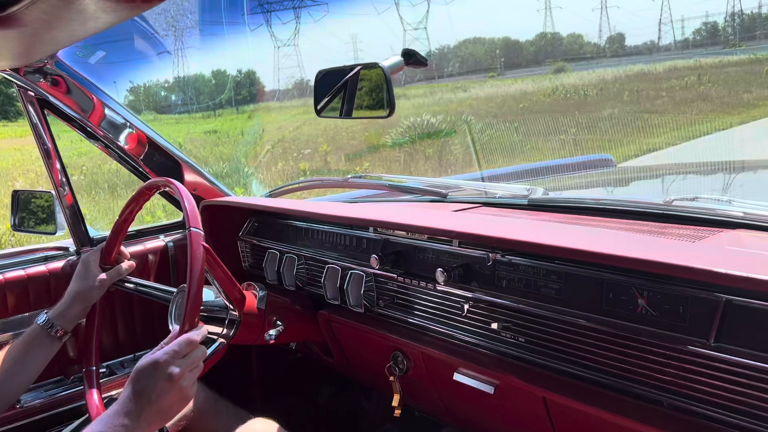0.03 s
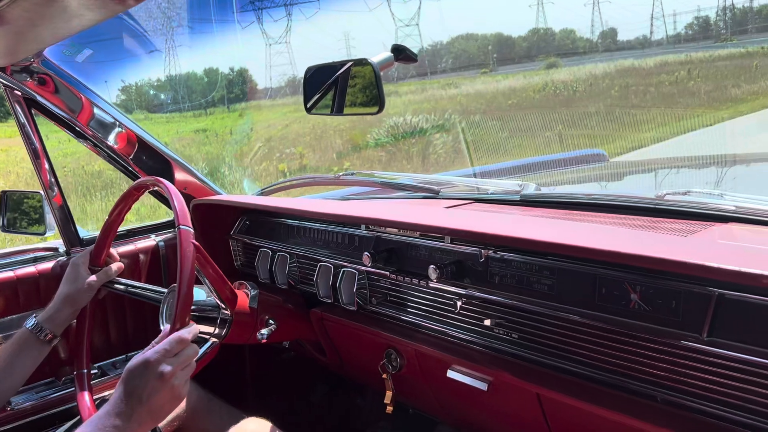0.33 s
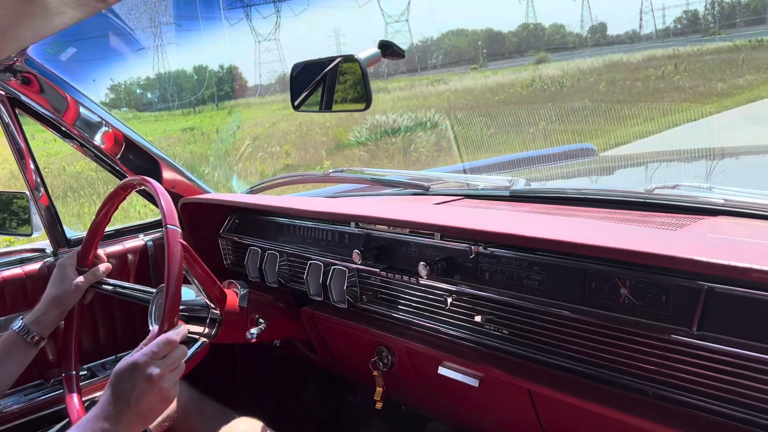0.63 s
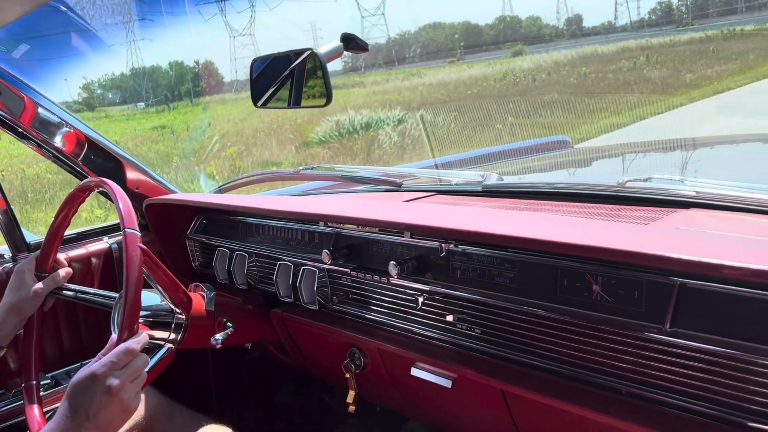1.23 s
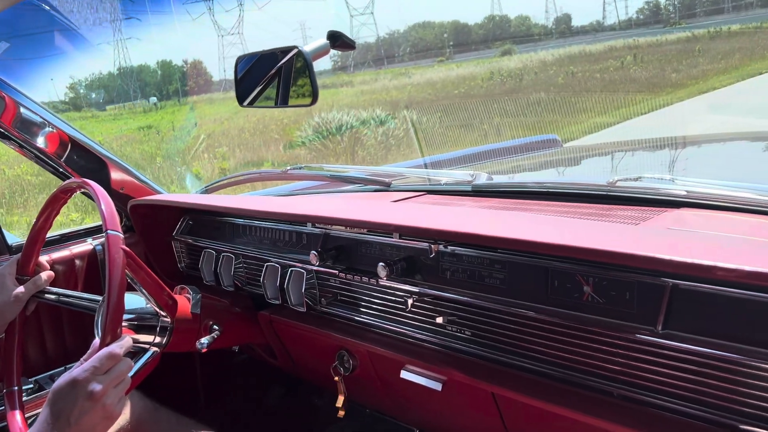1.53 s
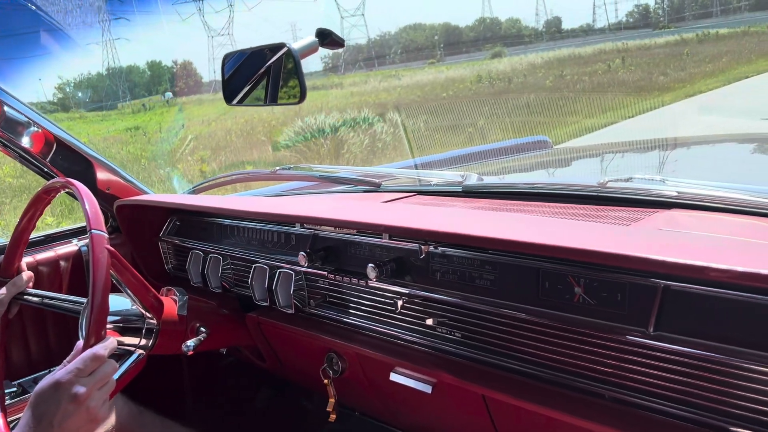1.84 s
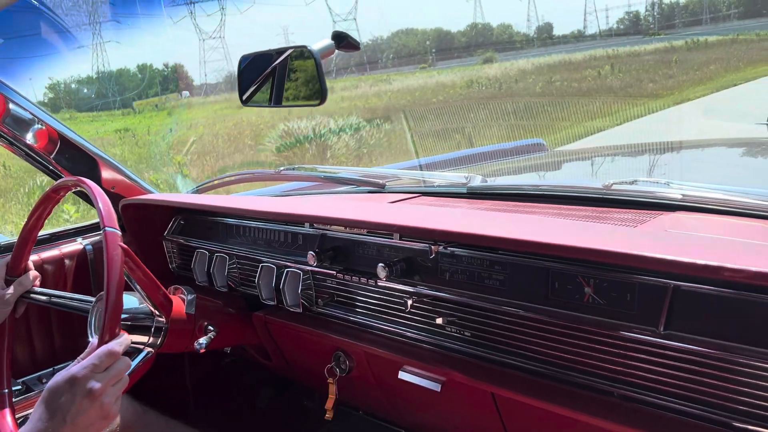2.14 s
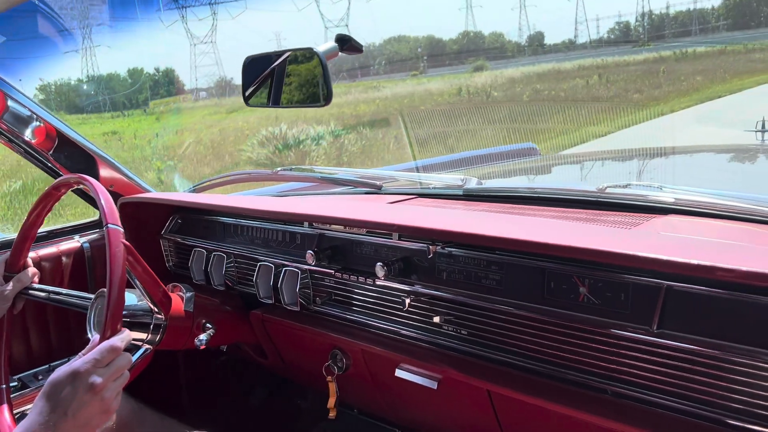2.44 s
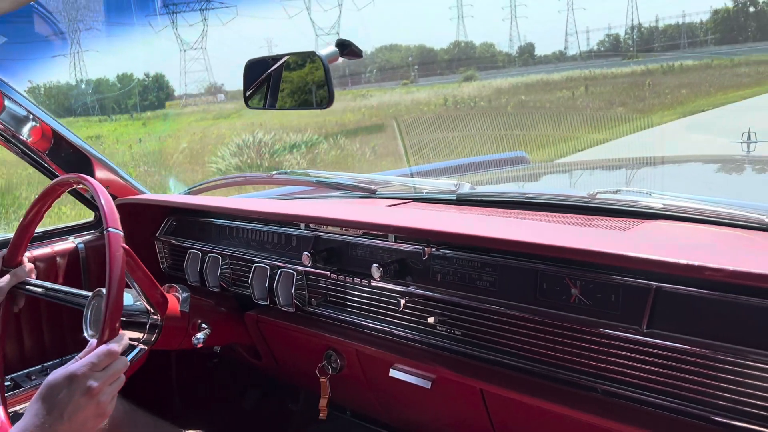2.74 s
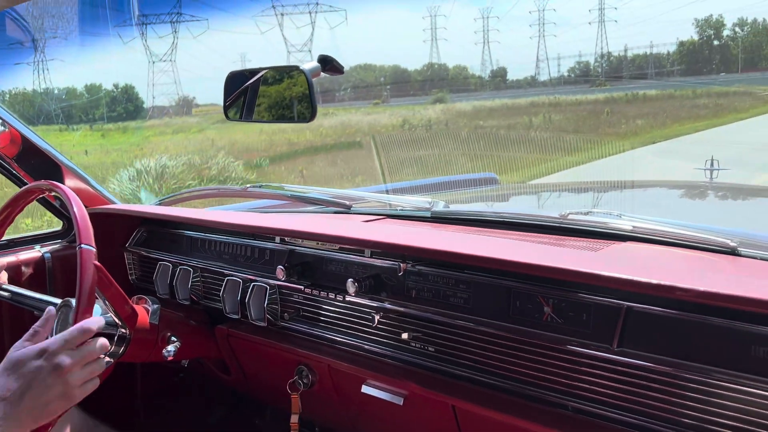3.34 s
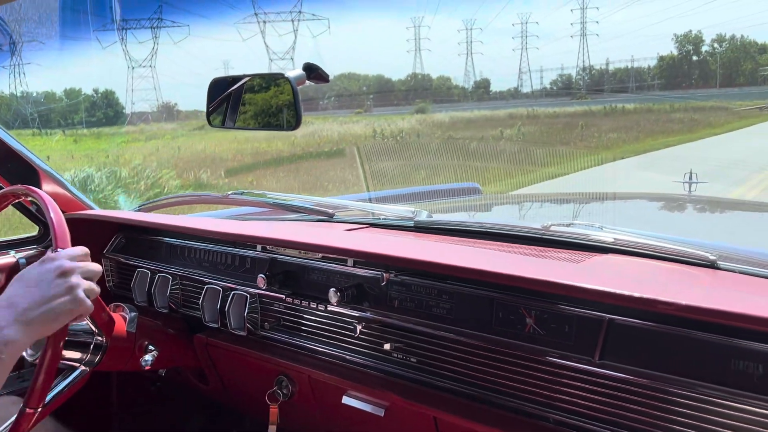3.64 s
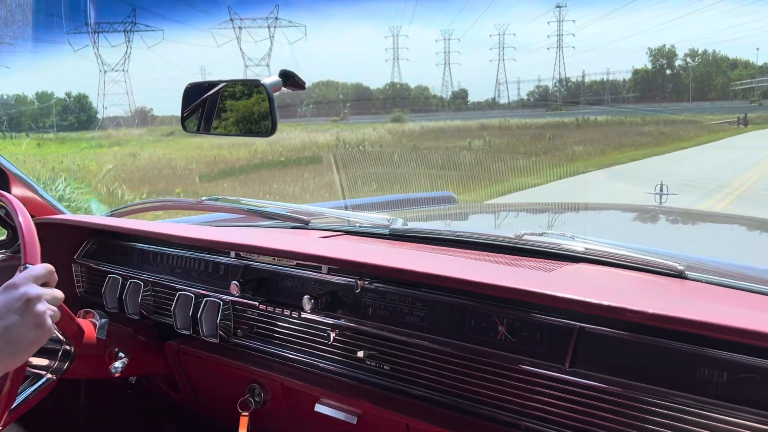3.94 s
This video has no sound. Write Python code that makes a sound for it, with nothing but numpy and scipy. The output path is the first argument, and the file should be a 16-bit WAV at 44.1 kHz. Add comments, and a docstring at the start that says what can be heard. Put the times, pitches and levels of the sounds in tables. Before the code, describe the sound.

Wind buffets the microphone in an old open car throughout, over low engine rumble, tyre roar and airy hiss. A sharp click sounds close by at 0.6 seconds. The wind eases around 1 second, then returns at 1.4 as a hand rubs the steering wheel. From 2 seconds the driving noise builds, with a few soft knocks, the strongest gusts near 2.1 and 2.9, and faint wheel creaks after 3.

```python
"""Inside an old open car that rolls through a bend and gathers speed, a stereo microphone in the draught.
Eddies of wind buffet the microphone, each a short puff that sinks into a thud. Below them the engine
rumbles in uneven exhaust pulses, and tyre roar and the hiss of passing air rise with speed.
Close by, something clicks in the cabin, a hand slides over the steering wheel and the wheel creaks."""
import sys
import numpy as np
from scipy import signal
from scipy.fft import rfft, irfft
from scipy.io import wavfile
from scipy.ndimage import uniform_filter1d, map_coordinates

SR = 44100
rng = np.random.default_rng(int(sys.argv[2]) if len(sys.argv) > 2 else 0)


def dump(signal):
    """Clip the signal to [-1, 1] and save it as 16-bit WAV at the path in sys.argv[1]."""
    limited = np.clip(np.atleast_2d(signal).T, -1, 1)
    pcm = np.round(limited * 32767).astype(np.int16)
    wavfile.write(sys.argv[1], SR, pcm)


N = 176400

# Strong eddies on the microphone. Each row: start in seconds, then thud, body, puff, rush in relative dB.
BUFFETS = [(0.044, -20, -42, -21, -45), (0.075, -21, -25, -28, -40), (0.083, -18, -32, -42, -45.5),
           (0.101, -32, -24, -27, -42), (0.115, -34, -23, -21.5, -44.5), (0.131, -38, -22, -22, -62),
           (0.169, -13, -27, -34, -46.5), (0.191, -25, -36, -16.5, -45), (0.253, -33, -16.5, -23, -54),
           (0.264, -35, -23.5, -46, -73), (0.271, -22, -20.5, -32, -64), (0.317, -16.5, -23, -31, -54),
           (0.343, -19.5, -29, -18.5, -45.5), (0.387, -14.5, -32.5, -25.5, -57),
           (0.402, -38, -22, -44, -61), (0.429, -24, -16, -39, -52), (0.449, -15, -56, -34, -65),
           (0.496, -47, -38, -35, -47.5), (0.51, -38, -36, -29, -61), (0.533, -31, -29, -37, -60),
           (0.559, -23.5, -33, -35, -61), (0.705, -18, -40, -56, -67), (0.82, -16, -50, -29, -46),
           (0.831, -20, -20, -32, -65), (0.865, -23, -29, -31.5, -54), (0.898, -30, -35, -35, -65),
           (1.342, -26.5, -27.5, -64, -50.5), (1.393, -19, -32, -38, -40.5), (1.475, -21, -32, -23.5, -45),
           (1.508, -35, -18, -14.5, -43), (1.525, -32, -28, -17, -61), (1.534, -12.5, -47, -46, -68),
           (1.565, -32.5, -24, -43, -48), (1.604, -22.5, -26.5, -20, -44), (1.641, -31, -18.5, -24.5, -50),
           (1.721, -20, -17, -27, -54), (1.731, -34, -20, -22.5, -52), (1.74, -14, -20, -13.5, -45),
           (1.808, -25, -31, -23.5, -44), (1.842, -33, -36, -24, -47), (1.879, -18.5, -23.5, -36, -49),
           (1.908, -26, -22.5, -24, -49), (1.944, -24, -30, -26.5, -45), (1.971, -29, -30, -19, -50),
           (2.029, -14.5, -41, -20.5, -66), (2.058, -20, -16.5, -23, -64), (2.071, -12, -38, -17.5, -58),
           (2.114, -46, -7.5, -30, -56), (2.144, -20, -15, -19, -50.5), (2.15, -30, -27, -29, -55),
           (2.164, -17, -16.5, -29, -67), (2.173, -34, -27, -31, -63), (2.183, -18, -35.5, -27, -56),
           (2.404, -28.5, -29, -25.5, -60), (2.463, -19, -23, -28, -52), (2.477, -20, -30, -21, -68),
           (2.487, -40, -20.5, -27, -53), (2.612, -17, -37, -15, -29.5), (2.619, -26, -21, -47, -70),
           (2.659, -19, -32, -23, -39.5), (2.737, -14.5, -21, -19, -45), (2.768, -12, -42, -30.5, -58),
           (2.805, -17.5, -22.5, -46, -64), (2.836, -20, -10.5, -23.5, -59), (2.841, -16.5, -6, -25.5, -55),
           (2.851, -22, -13, -22, -57), (2.875, -28, -23, -34, -46), (2.886, -15.5, -9, -20.5, -53),
           (2.915, -19, -19, -17.5, -51), (2.898, -14, -27, -30, -56), (2.93, -20.5, -16, -44, -60),
           (2.942, -23, -25, -48, -56), (3.003, -16, -37, -17, -37.5), (3.015, -15.5, -15.5, -20, -38),
           (3.127, -18.5, -23, -19, -40.5), (3.183, -19, -30, -24.5, -51), (3.294, -24.5, -22, -55, -65),
           (3.355, -15, -17.5, -29, -41.5), (3.547, -35, -23, -43, -50)]
# Noise of driving. Each row: time in seconds, tyre roar in dB, air hiss in dB.
DRIVING_LEVELS = [(0, -47.5, -67), (.62, -57, -65.5), (.83, -51, -62), (1.0, -55.5, -65.5),
                  (1.3, -53, -66.5), (1.7, -51.5, -66), (1.95, -55, -64.5), (2.07, -47, -60),
                  (2.6, -45.5, -62), (3.1, -43.5, -59.5), (3.6, -42, -60), (3.82, -41.5, -57),
                  (4, -41, -57.5)]
# Clicks in the cabin. Each row: start in seconds, snap in dB, knock in dB.
CLICKS = [(0.357, -44, -68), (0.6368, -30.5, -32.5), (0.6445, -38, -43.5), (0.662, -54, -53),
          (1.04, -56.5, -64), (2.163, -55, -39.5), (2.768, -64, -38), (3.294, -60, -37.5)]


def undb(db):
    """Decibels to gain."""
    return 10 ** (np.asarray(db) / 20)


def unit(x):
    """Scale to rms 1."""
    return x / np.sqrt(np.mean(x ** 2))


def curve(table, column=1):
    """One column of a table, joined by straight lines in time."""
    rows = np.array(table)
    return np.interp(np.arange(N) / SR, rows[:, 0], rows[:, column])


def gain_at(points, hz):
    """Gain of a (Hz, dB) spectrum."""
    rows = np.array(points)
    return undb(np.interp(np.log(hz + 1), np.log(rows[:, 0]), rows[:, 1]))


def bins():
    """Frequencies of the spectrum in Hz."""
    return np.arange(N // 2 + 1) * SR / N


def colour(x, points):
    """Filter by a (Hz, dB) spectrum, to rms 1."""
    return unit(irfft(rfft(x) * gain_at(points, bins()), N))


def noise(likeness):
    """White stereo noise whose channels share the given part of their power."""
    spectra = rfft(rng.standard_normal((3, N)))
    return irfft(np.sqrt(likeness) * spectra[2] + np.sqrt(1 - likeness) * spectra[:2], N)


def resonance(hz, width_hz):
    """A resonance driven by noise, rms 1."""
    return unit(irfft(rfft(noise(0.074)) / (1 + (2 * (bins() - hz) / width_hz) ** 2), N))


def walk(per_s):
    """Random levels, each held 1 / per_s seconds, smoothed twice."""
    hold = int(SR / per_s)
    steps = rng.standard_normal(N)[np.arange(N) // hold]
    return 2.66 * uniform_filter1d(uniform_filter1d(steps, hold), hold)


def swell(age):
    """An envelope that rises to 1 at age 1 and dies away."""
    return age * np.exp(1 - age)


def pan(x, left_db):
    """Lean a sound to the left."""
    return x * undb(np.array([[left_db], [-left_db]]) / 2)


def wind():
    """Right on the microphone: strong buffets over a stream of small eddies that follows the draught."""
    # Strength of the draught. Each row: time in seconds, level in dB.
    draught = [(0, -41), (.05, -34.5), (.35, -39), (.55, -41), (.68, -48.5), (.79, -41), (.86, -46),
               (1.0, -54), (1.17, -57), (1.3, -75), (1.42, -40.5), (1.55, -38), (1.79, -45), (1.95, -38),
               (2.15, -32), (2.3, -38.5), (2.65, -36.5), (2.92, -32), (3.22, -39.5), (3.65, -36.5),
               (4, -36.5)]
    # Spectrum of the small eddies. Each row: frequency in Hz, gain in dB.
    eddy_colour = [(40, -24), (65, -2), (105, -1.5), (170, -1), (270, -6), (450, -3), (720, -8.5),
                   (1150, -33), (1800, -28)]
    # Where a buffet's thud, body and puff lie, in Hz.
    buffet_hz = [82.6, 301, 654]
    buffets, count = np.array(BUFFETS), 440
    times = (np.arange(count) + rng.random(count)) * N / SR / count
    sizes = undb(np.interp(times, *np.array(draught).T) + 4 * rng.standard_normal(count).clip(-2, 1.5))
    pressure = 0
    for hz in np.geomspace(48, 1500, 12):
        octaves_below = max(np.log2(buffet_hz[0] / hz), 0)
        octaves_above = max(np.log2(hz / buffet_hz[2]), 0)
        band_db = np.array([np.interp(np.log(hz), np.log(buffet_hz), row[1:4]) for row in buffets])
        band_db -= 6.5 + 14 * octaves_below + 23 * octaves_above
        strong = undb(band_db + 0.5 * rng.standard_normal(len(buffets)))
        small = sizes * gain_at(eddy_colour, hz) * undb(2.5 * rng.standard_normal(count))
        pressure += eddies(np.r_[buffets[:, 0], times], np.r_[strong, small], hz)
    return pan(pressure + rush(), left_db=1.0)


def eddies(times, sizes, hz):
    """Pressure wiggles of a few cycles in one band: low bands crest later, so a puff sinks to a thud."""
    # How far the two microphone ports differ. Each row: frequency in Hz, phase spread in cycles.
    port_spread = [(50, 0.37), (150, 0.26), (400, 0.14), (900, 1), (1700, 0.87)]
    apart = np.interp(hz, *np.array(port_spread).T)
    turns = rng.random((len(times), 3)).T
    phase = 2 * np.pi * (turns[2] + apart * (turns[:2] - .5))
    crest_cycles = 1.147
    cycles = np.arange(int(5 * crest_cycles * SR / hz)) * hz / SR
    wiggle = swell(cycles / crest_cycles) ** 3 * np.exp(2j * np.pi * cycles)
    kicks = np.zeros((2, N), complex)
    kicks[:, np.clip((times * SR).astype(int), 0, N - 1)] = sizes * np.exp(1j * phase)
    return signal.oaconvolve(kicks, wiggle[None], axes=1)[:, :N].real


def rush():
    """Each buffet breaks up into a brief, rough spray of air."""
    # Spectrum of the spray. Each row: frequency in Hz, gain in dB.
    spectrum = [(150, -30.5), (350, 10.5), (560, 4.5), (800, 3.5), (1150, -4), (1450, -14), (1900, -23),
                (4000, -50.5)]
    buffets, rise_s = np.array(BUFFETS), 0.005
    kicks = np.zeros(N)
    kicks[(buffets[:, 0] * SR).astype(int)] = undb(buffets[:, 4] + 6.5)
    envelope = signal.oaconvolve(kicks, swell(np.arange(SR // 10) / SR / rise_s))[:N]
    return colour(noise(likeness=0.16), spectrum) * envelope


def engine():
    """Eight uneven cylinders pulse the exhaust; the running gear hums; both swell with effort."""
    # Engine speed and effort. Each row: time in seconds, firings a second, level in dB.
    firing = [(0, 94.6, 0.5), (1.25, 92, -2.5), (2, 100, 0.5), (3.3, 100, 4.5), (4, 105, 7.5)]
    # Response of the exhaust. Each row: frequency in Hz, gain in dB.
    exhaust_colour = [(20, -26.5), (47, 11), (70, 5), (100, -3.5), (200, -6.5), (350, -22), (700, -48.5),
                      (2000, -66), (8000, -99.5)]
    # Resonances of the running gear. Each row: frequency in Hz, width in Hz, level in dB.
    gear_modes = [(102, 52, -63.5), (160.3, 38, -51.5), (506, 16, -61.5), (984, 140, -61)]
    cylinder_db, scatter_db = [3, 0.5, -0.5, 8.5, 1, -28.5, 2, -3.5], 2.5
    firings_so_far = np.floor(np.cumsum(curve(firing)) / SR)
    fired = np.flatnonzero(np.diff(firings_so_far))
    pulses = np.zeros(N)
    pulses[fired] = undb(np.resize(cylinder_db, len(fired)) + scatter_db * rng.standard_normal(N)[fired])
    exhaust = undb(-43.5) * colour(pulses - pulses.mean(), exhaust_colour)
    hum = sum(undb(db) * resonance(hz, width) for hz, width, db in gear_modes)
    return (exhaust + hum) * undb(curve(firing, column=2))


def tyres():
    """Tyres roar on the road, louder with speed; only the bass is alike in both channels."""
    # Spectrum of the roar. Each row: frequency in Hz, gain in dB.
    spectrum = [(40, -22), (100, -0.5), (250, -6.5), (500, -4.5), (750, -9), (1100, -10.5), (1600, -19),
                (2150, -22), (3200, -33), (6000, -38), (16000, -62)]
    likeness = 0.78 / (1 + (bins() / 120) ** 2)
    return colour(noise(likeness), spectrum) * undb(curve(DRIVING_LEVELS))


def passing_air():
    """The fluttering hiss of passing air grows with speed; faint, diffuse whistles in it grow faster."""
    # Spectrum of the hiss. Each row: frequency in Hz, gain in dB.
    spectrum = [(500, -8.5), (1800, 6), (2600, 6.5), (4000, 2.5), (5000, 0), (6200, 0), (7800, -3),
                (11500, -3), (14000, -2.5), (16000, -13)]
    # Whistles. Each row: frequency in Hz, width in Hz, relative level in dB.
    whistle_bands = [(2090, 150, -12), (4950, 520, -13), (6030, 770, -20.5), (7780, 1100, -13)]
    hiss_db = curve(DRIVING_LEVELS, column=2)
    whistles = sum(undb(db + 1.5 * walk(12)) * resonance(hz, width) for hz, width, db in whistle_bands)
    whistles *= undb(0.98 * (hiss_db - hiss_db.max()) + 4.5)
    hiss = colour(noise(likeness=0.046), spectrum) * undb(0.6 * walk(per_s=60))
    return pan((hiss + whistles) * undb(hiss_db), left_db=0.9)


def snaps():
    """Each click in the cabin starts with a sharp burst of bright noise."""
    # Spectrum of the burst. Each row: frequency in Hz, gain in dB.
    spectrum = [(500, 0), (2900, 2.5), (3800, -1.5), (5300, 1), (6100, -2), (7500, 9.5), (9000, 4.5),
                (12500, 4), (14000, -6), (16000, -8)]
    t, decay_s = np.arange(N) / SR, 0.0015
    envelope = sum(undb(db) * (t >= s) * np.exp(-np.maximum(t - s, 0) / decay_s) for s, db, _ in CLICKS)
    return colour(noise(likeness=0.59), spectrum) * envelope


def knocks():
    """Each click rings the part's short modes, a little differently at the two ports."""
    # Modes of the clicking part. Each row: frequency in Hz, level in dB, seconds to fall by 60 dB.
    modes = [(413, 5, 0.021), (603, 1, 0.022), (775, 3, 0.017), (1126, -3, 0.033), (1320, -4, 0.038),
             (1675, -6.5, 0.017), (2080, -15.5, 0.054), (2313, -16.5, 0.045), (3080, -12, 0.011),
             (3930, -15.5, 0.01)]
    age, out = np.arange(SR // 8) / SR, np.zeros((2, N))
    for start_s, _, knock_db in CLICKS:
        start = int(start_s * SR)
        for hz, db, t60 in modes:
            phase = 2 * np.pi * (rng.random() + 0.43 * rng.random((2, 1)))
            envelope = undb(knock_db + db - 60 * age / t60)
            out[:, start:start + len(age)] += envelope * np.sin(2 * np.pi * hz * age + phase)
    return out


def hand_rubs():
    """A hand slides over the steering wheel; the skin catches and slips, which makes it grainy."""
    # Strokes of the hand. Each row: middle in seconds, half length in seconds, level in dB.
    strokes = [(0.437, 0.01, -53), (0.558, .012, -61), (1.359, 0.014, -58), (1.398, 0.032, -42.5),
               (1.485, 0.012, -51.5), (1.508, 0.034, -42.5), (1.575, .018, -48.5), (1.652, 0.031, -51.5)]
    # Spectrum of the friction. Each row: frequency in Hz, gain in dB.
    spectrum = [(300, 19.5), (1000, 1), (1900, -4), (2800, 4.5), (4500, -1), (8000, -2), (12500, -2.5),
                (14500, -11), (16000, -17)]
    t = np.arange(N) / SR
    envelope = sum(undb(db) * np.exp(-((t - middle) / half) ** 2) for middle, half, db in strokes)
    return colour(noise(likeness=0.31), spectrum) * envelope * undb(walk(per_s=300))


def wheel_creaks():
    """The wheel creaks softly: short swells of one high resonance."""
    # Creaks. Each row: start in seconds, level in dB.
    creaks = [(3.127, -51), (3.22, -65), (3.285, -63), (3.861, -58)]
    t, rise_s = np.arange(N) / SR, 0.01
    envelope = sum(undb(db) * swell(np.maximum(t - start, 0) / rise_s) for start, db in creaks)
    return resonance(hz=5150, width_hz=800) * envelope


def scene():
    """At the microphone: sound from outside reaches the left port later; cabin sounds lean left."""
    left, right = tyres() + passing_air() + engine() + wind()
    lag_s = 0.00018
    late_left = map_coordinates(left, [np.arange(N) - lag_s * SR], mode="nearest")
    cabin = snaps() + hand_rubs() + wheel_creaks() + knocks()
    return np.array([late_left, right]) + pan(cabin, left_db=1.7)


def record(dry):
    """The sound fades in quickly after a brief silence; the high treble has a notch; the top is cut."""
    silence_s, fade_s = 0.032, 0.01
    notch_hz, notch_width_hz, notch_db, top_hz = 10094, 870, -34.5, 15600
    faded = dry * np.sin(np.pi / 2 * np.clip((np.arange(N) / SR - silence_s) / fade_s, 0, 1)) ** 2
    mirrored = np.hstack([faded, faded[:, ::-1]])  # keeps the end from ringing into the start
    hz = np.arange(N + 1) * SR / (2 * N)
    notch = undb(notch_db * np.exp(-((hz - notch_hz) / notch_width_hz) ** 2))
    notched = irfft(rfft(mirrored) * notch)[:, :N]
    return signal.sosfilt(signal.ellip(8, .2, 70, top_hz, fs=SR, output="sos"), notched)


dry = scene()
out = record(dry)
dump(out)
```